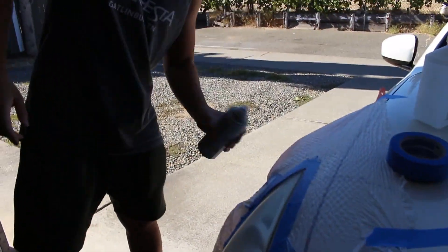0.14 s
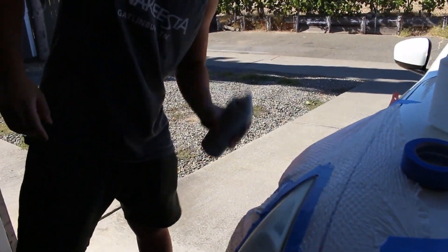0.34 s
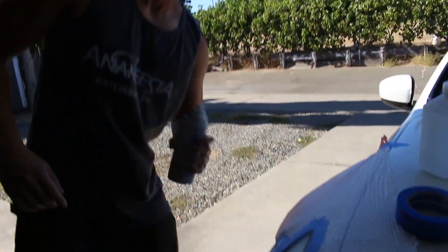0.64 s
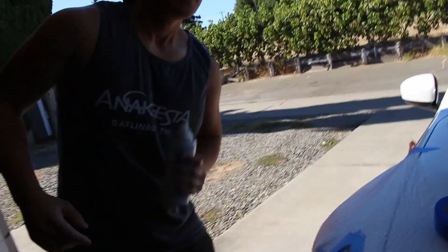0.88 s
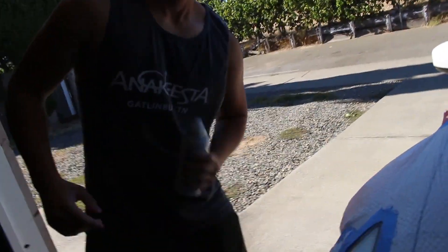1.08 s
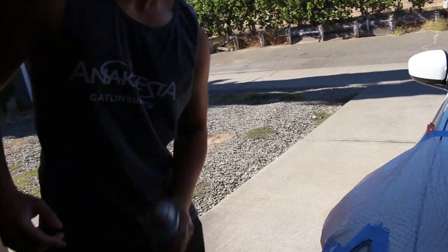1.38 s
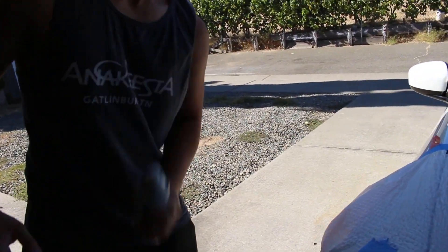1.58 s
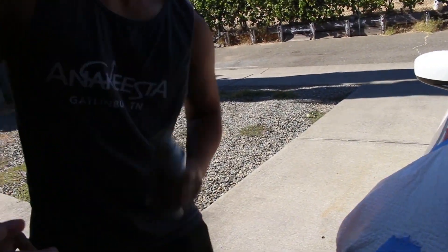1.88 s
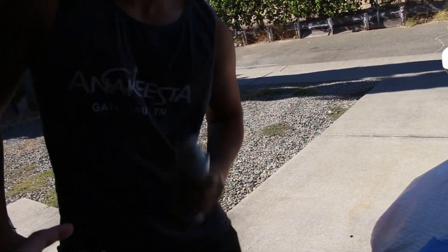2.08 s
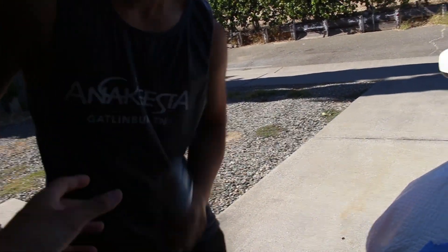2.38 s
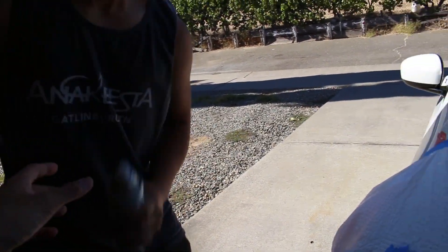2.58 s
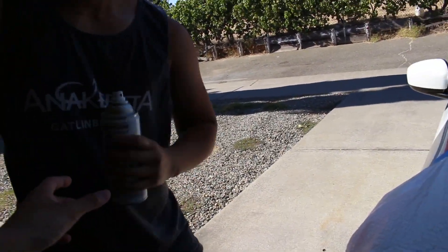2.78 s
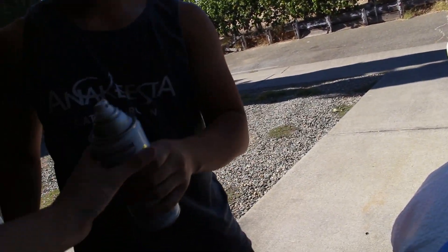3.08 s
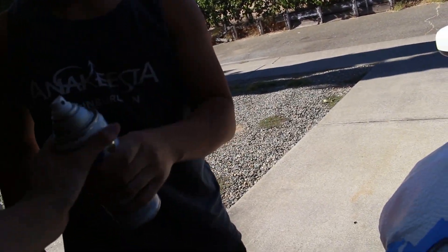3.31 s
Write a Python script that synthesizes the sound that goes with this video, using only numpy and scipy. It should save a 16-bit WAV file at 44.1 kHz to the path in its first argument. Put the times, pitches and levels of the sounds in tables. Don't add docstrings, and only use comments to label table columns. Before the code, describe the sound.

Close stereo pickup of a mixing ball cracking back and forth inside a spray can, paint hissing after each hit, short garage reflections, low engine hum outside; shaking ends and a last few knocks follow.

```python
import sys
import numpy as np
from scipy import signal
from scipy.io import wavfile

SR = 44100
rng = np.random.default_rng(int(sys.argv[2]) if len(sys.argv) > 2 else 0)


def volts_from_db(level):
    exponent = np.asarray(level, float) / 20
    return 10 ** exponent


def unload_wav(signal):
    wavfile.write(
        sys.argv[1],
        SR,
        np.round(np.clip(np.atleast_2d(signal).T, -1, 1) * 32767).astype(np.int16),
    )


N = 152145


def unit(x):
    return x / np.sqrt(np.mean(x ** 2) + 1e-20)


def at_hz(points, hz):
    table = np.array(points)
    return np.interp(np.log(hz), np.log(table[:, 0]), table[:, 1])


def sides(db):
    return volts_from_db(np.array([[db / 2], [-db / 2]]))


def drift(rate_hz):
    r = np.exp(-2 * np.pi * rate_hz * 40 / SR)
    white = rng.standard_normal(N // 40 + 2002)
    slow = signal.lfilter([1], [1, -2 * r, r * r], white)[2000:]
    return np.interp(np.arange(N) / 40, np.arange(len(slow)), unit(slow - slow.mean()))


def resonate(x, hz, width_hz):
    r = np.exp(-np.pi * width_hz / SR)
    return signal.lfilter([1, 0, -1], [1, -2 * r * np.cos(2 * np.pi * hz / SR), r * r], x)


# (frequency [Hz], likeness [0-1])
LIKENESS = [(60, 0.8), (250, 0.8), (1000, 0.79), (4000, 0.37), (12000, 0.57)]


def bands(white, low_hz):
    edges = low_hz * 2 ** np.arange(0, np.log2(19000 / low_hz), 0.5)
    for k, (low, high) in enumerate(zip(edges, edges[1:])):
        band_pass = signal.butter(2, [low, high], "band", fs=SR, output="sos")
        mid, side = signal.sosfilt(band_pass, white[k % 2])
        hz = np.sqrt(low * high)
        alike = np.clip(at_hz(LIKENESS, hz), 0, 1)
        yield hz, np.sqrt(1 + alike) * mid + np.sqrt(1 - alike) * side * np.array([[1], [-1]])


# (frequency [Hz], level [dB per Hz])
TRAFFIC = [(40, -20), (80, -12.5), (190, -10.5), (320, -17), (560, -19), (1550, -21), (5000, -37.5),
           (16000, -43)]
OUTSIDE_PAN_DB = -4


def traffic():
    air = 0
    for hz, band in bands(rng.standard_normal((2, 2, N)), low_hz=30.0):
        level = volts_from_db(at_hz(TRAFFIC, hz) + 1.06 * drift(1.13))
        air = air + band * level * sides(OUTSIDE_PAN_DB * min(1, 500 / hz))
    return volts_from_db(-45.5) * unit(air)


# (frequency [Hz], width [Hz], level [dB])
HUMS = [
    (119.7, 28.6, -50),
]


def hums_and_insect():
    insect = (3890, 60, -63)  # Hz, width Hz, dB
    out = 0
    for hz, width_hz, db in list(HUMS) + [insect]:
        once = resonate(rng.standard_normal(N), hz, width_hz)
        out = out + volts_from_db(db) * unit(resonate(once, hz, width_hz))
    return out


def machine():
    level = volts_from_db(-55 + 2.1 * drift(2.5))
    turn = 2 * np.pi * np.cumsum(296.2 + 0.57 * drift(0.81)) / SR
    return level * np.sqrt(2) * np.sin(turn)


# (time [s], firing rate [Hz], level [dB])
RUMBLE = [
    (0, 60.2, -45),
    (.52, 55.5, -52),
    (.85, 54.72, -66),
    (2.11, 54.05, -56),
    (2.5, 56.1, -48),
    (2.75, 57.4, -42),
    (3.45, 64.8, -55),
]
# (time [s], firing rate [Hz], level [dB])
IDLE = [
    (0.0, 86.8, -53),
    (0.25, 79.6, -51),
    (0.6, 86.95, -53),
    (0.7, 81.7, -51.5),
    (2.73, 81.46, -48.5),
    (3.35, 71.9, -53.5),
    (3.45, 70.8, -54),
]


def engine(rows, second_db):
    s, hz, db = np.transpose(rows)
    t = np.arange(N) / SR
    turn = 2 * np.pi * np.cumsum(np.interp(t, s, hz)) / SR
    tone = np.sin(turn) + volts_from_db(second_db) * np.sin(2 * turn)
    return volts_from_db(np.interp(t, s, db)) * np.sqrt(2) * tone


def outside():
    tones = hums_and_insect() + machine()
    tones = tones + engine(RUMBLE, second_db=-8) + engine(IDLE, second_db=-5.5)
    return traffic() + tones * sides(OUTSIDE_PAN_DB)


# (frequency [Hz], level [dB per Hz])
SLOSH = [(290, -100), (500, -20.5), (1250, -3.5), (2070, -4.5), (2930, -0.5), (4500, -1), (6500, -11),
         (8200, -18), (16000, -19)]
CAN_PAN_DB = 1.1


def slosh():
    drops_per_s, drop_spread_db, fizz_share = 1700, -0.5, 0.48
    t60_s, dulling, swell_share, swell_s = 0.12, 0.45, 0.52, 0.039

    kicks = np.full(N, 1e-9)
    kicks[0] = volts_from_db(-31)
    for s, *_, db in list(BASE) + list(TOP) + list(WALL):
        kicks[int(s * SR) + 40] = volts_from_db(db)

    landing = rng.random((2, 1, N)) < drops_per_s / SR
    drops = landing * volts_from_db(drop_spread_db * np.minimum(rng.exponential(1, (2, 1, N)), 5))
    white = rng.standard_normal((2, 2, N)) * (unit(drops) + fizz_share)

    q = np.exp(-1 / swell_s / SR)
    swell = signal.lfilter([np.e * (1 - q)], [1, -2 * q, q * q], kicks)
    together = drift(18.0)
    out, plain = 0, 0
    for hz, band in bands(white, low_hz=397.5):
        r = volts_from_db(-60 * (hz / 3000) ** dulling / t60_s / SR)
        fall = signal.lfilter([1], [1, -r], kicks)
        band = band * volts_from_db(at_hz(SLOSH, hz) + 1.2 * together + 1.2 * drift(50))
        plain = plain + band
        out = out + band * (fall + swell_share * swell * min(1, 5000 / hz))
    return out / np.sqrt(np.mean(plain ** 2)) * sides(CAN_PAN_DB)


def blows(rows, modes, t60_s, spread, free_s, own_db, contact_s):
    damped_db, scatter_db, crack_db, crack_s = -9, 2, -5, 0.00044
    mode_pan_db, mode_lag_s, left_lag_s = 1.5, 0.000015, 0.00002
    t = np.arange(1024) / SR
    out = np.zeros((2, N + len(t)))
    side = np.array([[0.5], [-0.5]])
    damping = volts_from_db(damped_db) + (1 - volts_from_db(damped_db)) * np.exp(-(t / free_s) ** 4)
    press = 1 - np.exp(-t / contact_s)
    crack_band = signal.butter(2, [1200, 9460], "band", fs=SR)
    crack_fall = volts_from_db(crack_db) * np.exp(-t / crack_s) * 0.00012 / contact_s

    for s, db, own_hz, tilt_db, *_ in rows:
        hz, level_db = np.repeat(np.transpose(list(modes) + [(own_hz, own_db)]), 7, axis=1)
        a, b, c, d = rng.standard_normal((4, len(hz)))
        hz = hz * (1 + spread * a * np.where(hz == own_hz, 0.4, 1))
        level_db = level_db + scatter_db * b + tilt_db * np.log2(hz / own_hz)
        gain = volts_from_db(level_db + side * mode_pan_db * c)[..., None]
        lag = (side * (mode_lag_s * d + left_lag_s))[..., None]
        phase = 2 * np.pi * hz[:, None] * (t + lag) + c[:, None]
        fall = volts_from_db(-60 * t / t60_s * (hz[:, None] / 3000) ** 0.7)
        ring = -np.sum(gain * np.sin(phase) * fall, axis=1) * damping * press
        noise = rng.standard_normal(len(t)) + 0.5 * rng.standard_normal((2, len(t)))
        crack = signal.lfilter(*crack_band, noise) * crack_fall
        i = int(s * SR)
        out[:, i:i + len(t)] += volts_from_db(db) * (ring / np.abs(ring).max() + crack)
    return out[:, :N] * sides(CAN_PAN_DB)


# (time [s], peak level [dB], ring [Hz], tilt [dB/octave])
KNOCKS = [(0.05, -22.5, 1780, 1), (0.101, -19.5, 1880, 6), (0.124, -23.5, 1580, -11),
          (0.161, -20.5, 1540, 1), (0.188, -23, 2570, 15), (0.246, -16.5, 1740, 5),
          (0.343, -24.5, 1920, 2), (0.428, -9, 1770, 1.5), (0.445, -12.5, 1660, 8),
          (0.498, -24, 1810, 7), (0.5535, -13.5, 880, 5.5), (0.564, -23.5, 1750, 7),
          (0.668, -16, 2500, 13), (0.709, -14, 1880, 2), (0.731, -22, 2070, -1),
          (0.875, -10.5, 826, 7), (2.842, -20, 1065, 6.5), (2.938, -25, 1536, 4),
          (3.045, -16, 1530, 4.5), (3.12, -16.5, 1446, 6), (3.17, -24, 1130, 7), (3.233, -29, 1745, 3)]
# (time [s], peak level [dB], ring [Hz], tilt
# [dB/octave])
MORE_KNOCKS = [(1.066, -14.5, 1850, 10.5), (1.3865, -19.5, 2050, 9), (1.605, -11, 1243, 7.5),
               (1.789, -13.5, 1020, 7.5), (1.808, -17, 1200, 4), (1.873, -14.5, 2000, 2.5),
               (1.99, -12, 1070, 8), (2.178, -21, 1920, -10), (2.384, -20, 2006, -13),
               (2.572, -13, 1880, 10), (2.606, -10, 1300, 4), (2.622, -18, 1200, 2), (2.673, -10, 1190, 6),
               (2.692, -17, 1094, 8)]
# (time [s], peak level [dB], strongest ring [Hz], tilt [dB/octave], slosh level [dB])
WALL = [
    (0.6515, -7.5, 1790, 6, -28.5),
    (2.027, -8, 1240, 5.5, -50),
    (3.247, -6.5, 1890, 4.5, -54),
]
# (time [s], peak level [dB], ring [Hz], tilt
# [dB/octave])
EXTRA_KNOCKS = [(0.2004, -10.5, 3930, 8.5), (0.2045, -13.5, 3470, 11), (0.2125, -13, 3600, 6),
                (0.228, -22, 2070, 3), (0.3485, -22.5, 1830, 6), (0.4195, -20, 2770, 15), (0.456, -16, 1900, -7),
                (0.4875, -22.5, 1710, -5), (0.5067, -21.5, 3100, 4), (0.5178, -24, 1600, 3.5),
                (0.5435, -33, 1980, 2), (0.5885, -28, 1790, 5), (0.6194, -27.5, 3410, 10), (0.6868, -23, 1660, 12),
                (0.799, -30, 1836, 0), (1.0025, -6, 4800, 7), (1.1487, -23.5, 3290, 1), (1.1928, -25, 2216, 5),
                (1.255, -26, 2900, 0), (1.403, -16, 2630, 1), (1.4113, -7.5, 3880, 7), (1.423, -30, 3720, 13),
                (1.4345, -22, 2210, 3), (1.4585, -13.5, 1985, 11), (1.468, -15.5, 2100, -5),
                (1.5763, -24, 2990, 13), (1.670, -28, 8000, 10), (1.678, -23, 9800, 6), (1.823, -42, 2008, 8),
                (1.9728, -50, 3300, 6), (2.005, -38, 3240, 13), (2.047, -13.5, 1160, -1), (2.068, -19, 3050, 2),
                (2.078, -20, 1990, 4), (2.098, -16, 1290, 7), (2.2877, -17.5, 3990, -2), (2.3745, -32, 3350, 11),
                (2.4135, -22, 2040, 13), (2.426, -25.5, 1960, -21), (2.465, -24.5, 2000, -10),
                (2.4848, -16, 2960, 12), (2.862, -30.5, 1940, 8), (3.0537, -41, 2330, 0), (3.251, -9.5, 2450, 8.5)]
# (frequency [Hz], level [dB])
WALL_MODES = [(800, -15.5), (1100, -4.5), (1550, -62), (1950, -1), (2500, -4), (3100, -10), (3900, -8.5),
              (5000, -27.5), (6300, -14.5), (8200, -17), (11000, -27.5)]


def ball_on_wall():
    rows = list(KNOCKS) + list(MORE_KNOCKS) + list(WALL) + list(EXTRA_KNOCKS)
    return blows(rows, WALL_MODES, t60_s=0.014, spread=0.09, free_s=0.004, own_db=3, contact_s=0.0004)


# (time [s], peak level [dB], strongest ring [Hz], tilt [dB/octave], slosh level [dB])
TOP = [(0.089, -9.5, 6230, 1.5, -43.5), (0.9205, -2.5, 2960, 0, -38.5), (1.1065, -1.5, 7460, -0.5, -36.5),
       (1.323, -2.5, 2790, 2, -40), (1.5385, -4.5, 8360, -1, -42.5), (1.749, -2.5, 5870, -0.5, -57),
       (1.946, -2, 1920, -0.5, -40.5), (2.153, -1, 2946, 1.5, -61), (2.338, -4.5, 2340, -2, -35.5),
       (2.541, -5, 7630, -1, -33.5), (2.757, -6, 3030, -1, -47), (3.395, -10.5, 2780, -2, -52)]
# (frequency [Hz], level [dB])
TOP_MODES = [(550, -13.5), (1000, -10.5), (1500, -5.5), (2250, 0), (3100, 3), (4950, 2.5), (5700, 3),
             (6220, 4.5), (7460, 7), (8200, 0.5), (10100, 3), (13000, -7)]


def ball_on_shoulder():
    return blows(TOP, TOP_MODES, t60_s=0.018, spread=0.05, free_s=0.0035, own_db=2, contact_s=0.00012)


# (time [s], peak level [dB], strongest ring [Hz], tilt [dB/octave], slosh level [dB])
BASE = [(0.1955, -2, 3400, -5, -25), (0.387, 0, 3900, -0.5, -26), (0.817, -4.5, 2730, 2.5, -30.5),
        (0.998, 4.5, 3500, 3.5, -27.5), (1.007, -10.5, 3290, -7, -39), (1.204, 4, 3480, 11, -33.5),
        (1.226, -3.5, 3420, 12, -27.5), (1.4065, 2.5, 4300, 8.5, -27), (1.631, 3.5, 3000, -2.5, -34.5),
        (1.657, -4.5, 3200, 8, -27.5), (1.837, 0, 3360, 9.5, -26), (2.040, -2.5, 3000, -6, -24),
        (2.052, 0, 2560, -6, -56), (2.087, -3.5, 3660, 9.5, -74), (2.232, 4.5, 3000, 8.5, -26.5),
        (2.43, 5, 3200, 7, -26.5), (2.637, 0.5, 3000, 15, -28.5)]
# (frequency [Hz], level [dB])
BASE_MODES = [(550, -31), (1250, -18), (1850, 1), (2560, 11.5), (3000, 12), (3420, 17.5), (4040, 13),
              (4800, 9), (6000, 5.5), (8250, 1), (11000, -11), (14000, -25)]


def ball_on_base():
    return blows(BASE, BASE_MODES, t60_s=0.013, spread=0.11, free_s=0.0024, own_db=0, contact_s=0.00012)


# (frequency [Hz], level [dB])
GARAGE_COLOUR = [(500, -3.5), (1100, -4.5), (2000, 1), (4000, 2.5), (8000, 0.5), (14000, -6)]


def garage(x):
    t60_s, dulling, gap_s = 0.23, 0.033, 0.00058
    t = np.arange(SR // 2) / SR
    tail = 0
    for hz, band in bands(rng.standard_normal((2, 2, len(t))), low_hz=191.3):
        fall_db = -60 * t * (hz / 3000) ** dulling / t60_s
        tail = tail + band * volts_from_db(at_hz(GARAGE_COLOUR, hz) + fall_db)
    tail = tail * np.clip(t / gap_s - 1, 0, 1)
    tail = tail / np.sqrt(np.sum(tail ** 2) / 2)
    return volts_from_db(-9) * signal.fftconvolve(x.mean(0)[None], tail, axes=1)[:, :N]


def scene():
    ball = ball_on_wall() + ball_on_shoulder() + ball_on_base()
    ball = signal.sosfilt(signal.butter(3, 580, "high", fs=SR, output="sos"), ball)
    return outside() + slosh() + ball + garage(ball)


def low_pass(x):
    return signal.sosfilt(signal.butter(12, 16550, fs=SR, output="sos"), x)


def record(dry):
    ceiling = 1.3
    rounded = ceiling * np.tanh(dry / ceiling)
    cut = signal.sosfilt(signal.cheby2(10, 30, 16300, fs=SR, output="sos"), rounded)
    return low_pass(np.clip(cut, -1, 1))


dry = scene()
out = record(dry)
unload_wav(out)
```